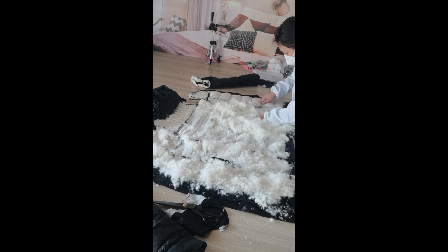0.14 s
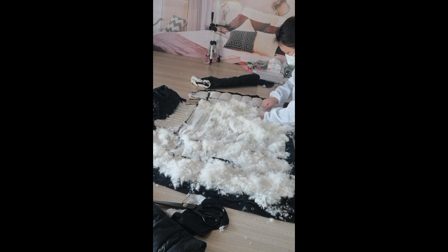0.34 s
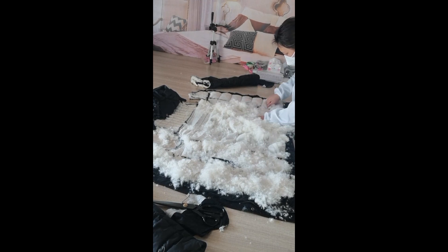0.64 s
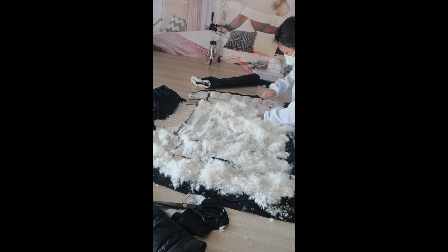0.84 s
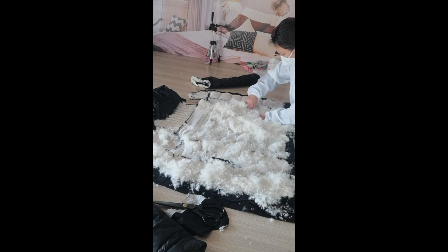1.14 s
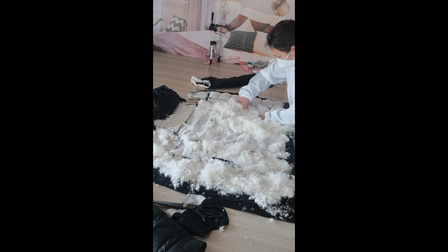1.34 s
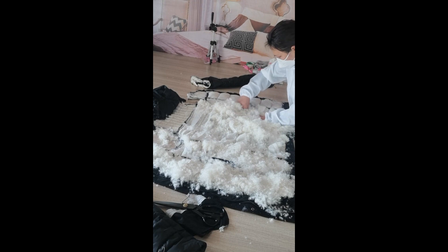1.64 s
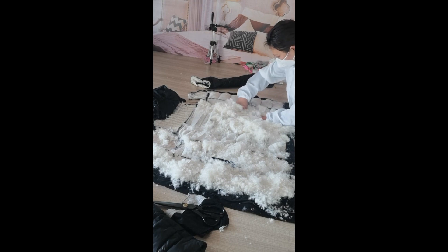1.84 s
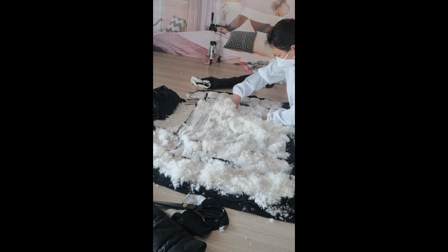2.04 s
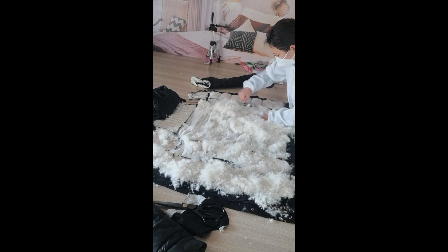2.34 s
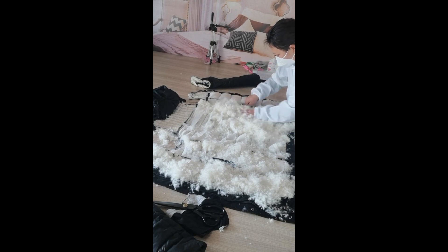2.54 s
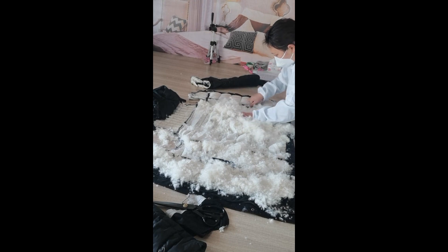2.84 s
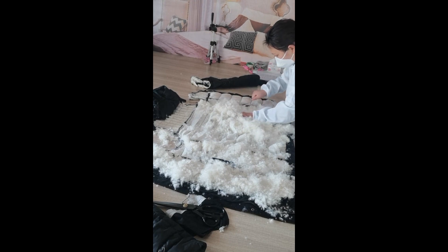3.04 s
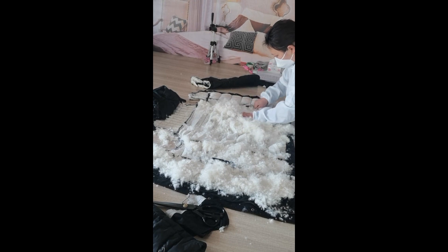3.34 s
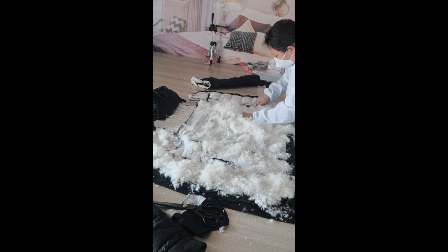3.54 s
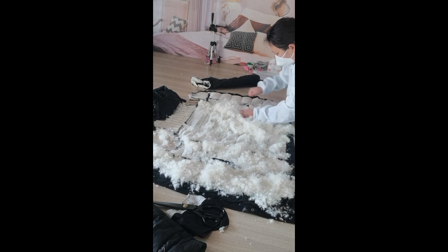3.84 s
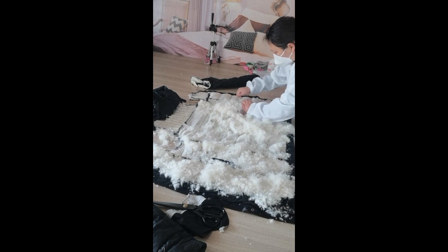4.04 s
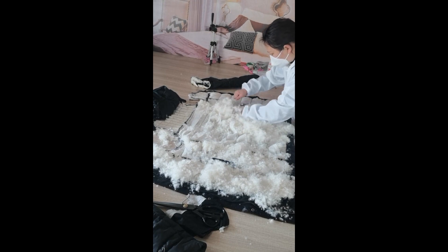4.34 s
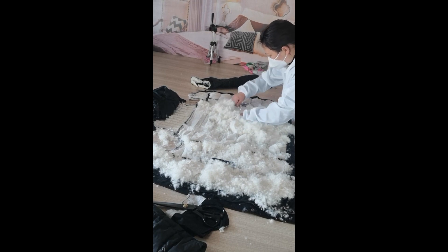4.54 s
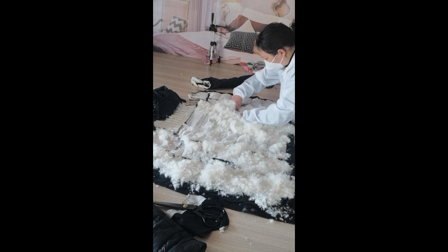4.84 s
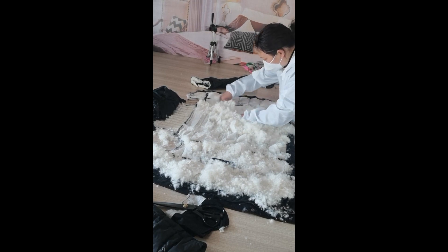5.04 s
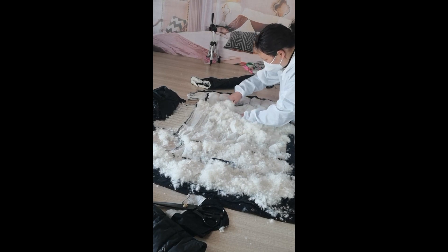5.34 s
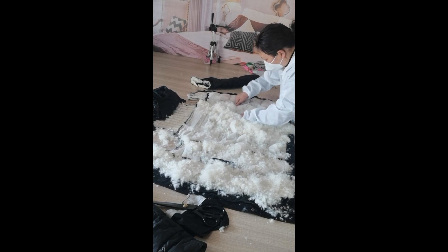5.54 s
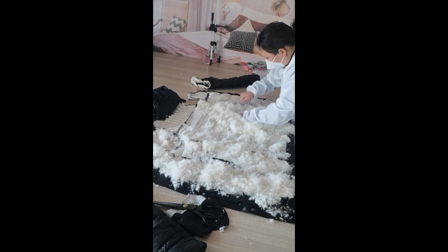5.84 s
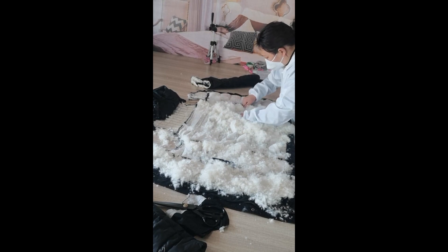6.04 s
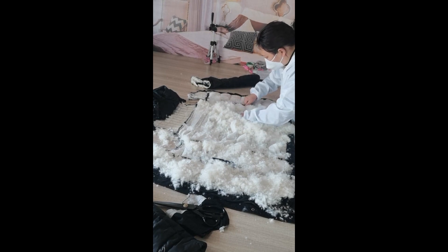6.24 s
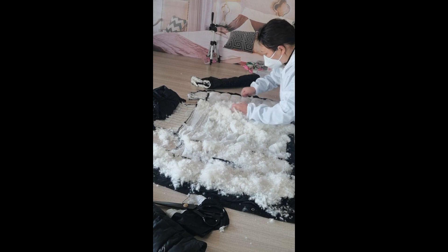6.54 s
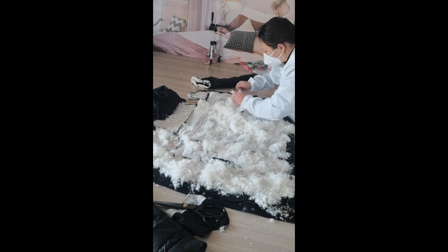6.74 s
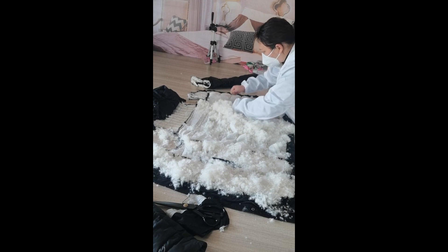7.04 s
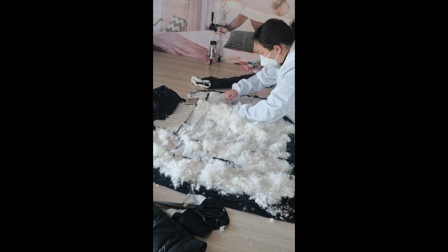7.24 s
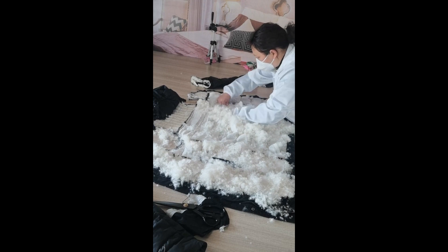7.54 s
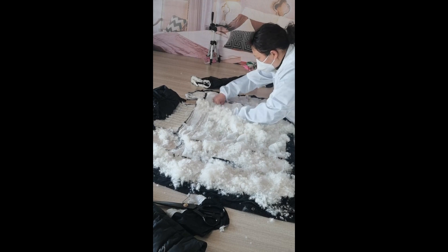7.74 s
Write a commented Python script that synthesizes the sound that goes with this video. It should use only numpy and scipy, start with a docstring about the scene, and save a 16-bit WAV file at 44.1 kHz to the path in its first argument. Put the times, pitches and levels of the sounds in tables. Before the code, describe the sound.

In a quiet furnished room, thin nylon fabric tears in quick, raspy bursts, each swelling and fading within about half a second. The jerked cloth thuds softly on the floorboards and rustles as it settles. The rips come in two runs, followed by a small dry finger tick, sleeve brushing and one softer tear. Two nearby microphones pick up a brief room echo and a faint steady rumble.

```python
"""Ripping thin nylon cloth

Hands rip the cloth in short pulls on a wooden floor, in a furnished room. Threads snap in a dense, uneven
crackle, the jerked cloth stirs the room's low notes into a boom, and the room echoes. Between pulls the cloth
rustles over a quiet rumble. Two microphones, a little apart, hear it all."""
import sys
import numpy as np
from scipy import signal
from scipy.fft import rfft, irfft, next_fast_len
from scipy.io import wavfile
from scipy.ndimage import map_coordinates

SR = 44100
rng = np.random.default_rng(int(sys.argv[2]) if len(sys.argv) > 2 else 0)


def waveform_to_disk(signal):
    """Save audio, clipped to [-1, 1], as 16-bit WAV at the path in sys.argv[1]."""
    frames = np.transpose(np.atleast_2d(signal))
    scaled = np.clip(frames, -1, 1) * 32767
    samples = np.round(scaled).astype(np.int16)
    wavfile.write(sys.argv[1], SR, samples)


N = 348390


def amp(db):
    """Turn decibels into a number to multiply by."""
    return 10 ** (np.asarray(db) / 20)


def unit(x):
    """Scale a signal so its average power is 1."""
    return x / np.sqrt(np.mean(x ** 2) + 1e-20)


def along(points, hz):
    """Read between the rows of a (Hz, value) table, with octaves evenly spaced."""
    freqs, values = np.transpose(points)
    return np.interp(np.log(hz + 1), np.log(freqs + 1), values)


def wobble(rate):
    """A smooth curve through `rate` random values a second."""
    return map_coordinates(rng.standard_normal(int(N * rate / SR) + 4), [np.arange(N) * rate / SR])


def filtered(x, response):
    """Multiply each frequency in x by response(hz)."""
    size = next_fast_len(N + SR // 2)
    return irfft(rfft(x, size) * response(np.fft.rfftfreq(size, 1 / SR)), size)[..., :N]


# How alike left and right are. Each row: frequency in Hz, likeness from 0 to 1.
LIKENESS = [(60, 1), (250, 1), (450, 1), (900, 0.23), (1900, 0.02), (4000, 0.05), (15000, 0.2)]
def diffuse(pair, spectrum, gap_s=.00055):
    """Colour and blend two noises; the travel time between microphones makes their likeness swing."""
    length = pair.shape[1]
    size = next_fast_len(2 * length)
    hz = np.fft.rfftfreq(size, 1 / SR)
    likeness = np.clip(along(LIKENESS, hz), 0, 1) * np.cos(2 * np.pi * hz * gap_s)
    turn = np.arccos(likeness) / 2
    coloured = rfft(pair, size) * amp(along(spectrum, hz))
    mid, side = irfft(coloured * [np.cos(turn), np.sin(turn)], size)[:, :length]
    return np.array([mid + side, mid - side])


# The colour of the quiet room. Each row: frequency in Hz, relative level in dB.
ROOM_COLOUR = [(12, -34), (20, -8.5), (49, 1), (70, -1.5), (103, -2.5), (157, -6), (281, -9.5),
               (382, -16.5), (613, -19.5), (787, -12.5), (855, -15), (1670, -15), (2600, -18.5),
               (6890, -37.5), (15400, -38)]
def room_tone():
    """A constant rumble and hiss whose level wavers slightly."""
    return amp(-64.5 + 1.4 * wobble(10)) * unit(diffuse(rng.standard_normal((2, N)), ROOM_COLOUR))


# Weight shifting on the floor. Each row: time in seconds, level in dB.
KNEE_LEVELS = [(2.08, -72), (2.148, -59), (2.192, -51), (2.25, -64), (2.32, -77)]
def knee_shift():
    """A knee shifts and the floor gives a low, soft rumble."""
    times, db = np.transpose(KNEE_LEVELS)
    colour = [(10, -8.5), (25, 22), (55, 24), (90, -51)]
    rumble = filtered(rng.standard_normal(N), lambda hz: amp(along(colour, hz)))
    return amp(np.interp(np.arange(N) / SR, times, db, left=-120, right=-120)) * unit(rumble)


# How long the room rings. Each row: frequency in Hz, seconds to fade by 60 dB.
RING_TIMES = [(100, 0.6), (500, 0.41), (2000, 0.39), (5000, 0.36), (10000, 0.24)]
def room_echo(x, piece_s=.25, delay_s=.0075):
    """Each frequency dies at its own speed; the tearing point moves, so each piece gets a new tail."""
    out, step = np.zeros((2, N + SR)), round(piece_s * SR)
    for start in range(0, N, step):
        hz, t, noise = signal.stft(rng.standard_normal((2, SR // 2)), SR, nperseg=256)
        decay = amp(-60 * t / along(RING_TIMES, hz)[:, None])
        tail = signal.istft(noise * decay, SR, nperseg=256)[1]
        tail = diffuse(tail, [(100, 0.016), (1000, 0), (8000, 0.0058)])
        echo = signal.fftconvolve(x[None, start:start + step], tail / np.linalg.norm(tail[0]), axes=1)
        out[:, start + round(delay_s * SR):][:, :echo.shape[1]] += echo
    return out[:, :N]


# The straight path, then four wall bounces. Each row: left delay, right delay, in seconds.
PATH_DELAYS = [(0, .00005), (.00417, .0036), (.0059, .00644), (.0101, .01065), (.0134, .0131)]
# The same paths. Each row: left gain, right gain, in dB.
PATH_GAINS = [(-0.5, -5), (-12, -7), (-3, -1.5), (-6.5, -8.5), (-15.5, -7)]
def early_paths(x):
    """Sound arrives straight, then off the walls; the bounces drift a little as the hands move."""
    out = np.zeros((2, N))
    for delays, gains_db in zip(PATH_DELAYS, PATH_GAINS):
        drift = 0.025 * delays[0] * wobble(4)
        for side, (delay, db) in enumerate(zip(delays, gains_db)):
            out[side] += amp(db) * map_coordinates(x, [np.arange(N) - SR * (delay + drift)])
    return out


def squeak(middle_s=7.45, half_length_s=.2, hz=1481.5):
    """A faint, thin tone swells and fades."""
    t = np.arange(N) / SR
    return amp(-76) * np.exp(-((t - middle_s) / half_length_s) ** 2) * np.sin(2 * np.pi * hz * t)


def finger_tick(start_s=6.5755, hz=1700, width_hz=500):
    """The fingers make one dull, dry tick: a tone that dies almost at once."""
    age = np.clip(np.arange(N) / SR - start_s, 0, 1)
    envelope = np.exp(-np.pi * width_hz * age) * (1 - np.exp(-age / 0.00017))
    return -amp(-39) * np.sin(2 * np.pi * hz * age) * envelope


# The two colours of rustling. Each row: frequency in Hz, relative level in dB.
SWISH_COLOUR = [(600, -30), (1300, -8.5), (1900, 9), (2800, -0.5), (4000, -28.5)]
HISS_COLOUR = [(2800, -2), (4200, -6), (6800, -3.5), (7600, -8.5), (8400, -27.5), (15000, -18)]
# A sleeve brushes past. Each row: middle and half length in seconds, swish and hiss levels in dB.
SLEEVE_BRUSHES = [(.02, 0.055, -75, -70), (1.21, 0.076, -98, -71.5), (1.953, 0.058, -65.5, -83),
                  (2.42, 0.085, -64.5, -89), (3.245, 0.047, -87, -104), (4.47, .15, -101, -80),
                  (4.79, 0.034, -68, -74), (5.015, 0.12, -79, -77), (7.303, 0.23, -93, -77),
                  (7.587, .08, -76, -86)]
def rustle(settle_db_per_s=44.5):
    """Sleeves brush and the cloth settles after each pull (see PULLS): a swish and a finer hiss."""
    t = np.arange(N) / SR
    out = 0
    layers = [(SWISH_COLOUR, -80.5, -35.5), (HISS_COLOUR, -77, -42.5)]
    for layer, (colour, rest_db, settle_db) in enumerate(layers):
        level = amp(rest_db + 1.2 * wobble(5))
        for middle, half_length, *db in SLEEVE_BRUSHES:
            level += amp(db[layer]) * np.exp(-((t - middle) / half_length) ** 2)
        for start, swell, _, _, swelled_db, *_ in PULLS:
            since = t - start - swell
            level += (since > 0) * amp(swelled_db + settle_db - settle_db_per_s * np.abs(since))
        grains = np.array([threads(per_second=4000, spread_db=-0.5, clump_db=-1)
                           * rng.choice([-1, 1], N) for _ in range(2)])
        out = out + level * amp(1.4 * wobble(21)) * unit(diffuse(grains, colour))
    return out


# The room's low notes. Each row: frequency in Hz, width in Hz, relative level in dB.
ROOM_NOTES = [(96, 23, -9.5), (132.2, 15.3, 0.5), (196, 33.4, -6.5)]
def room_boom(shaking):
    """The jerked cloth stirs the room, which rings at its own low notes."""
    def response(hz):
        return sum((-1) ** k * amp(db) * 1j * hz * width / (note ** 2 - hz ** 2 + 1j * hz * width)
                   for k, (note, width, db) in enumerate(ROOM_NOTES))
    return amp(25) * filtered(shaking, response)


# Pulls on the cloth. Each row: start, swell time and fade time in seconds, crackle level in dB before
# and after the swell, then how many dB to add to that for the boom, flap, dull, bright and rasp parts.
PULLS = [(.03, 0.061, 0.034, -62, -44, -6, -5, -9, -3, 1.5),
         (0.092, 0.08, .23, -36.5, -32, -15.5, -16, -13, -7.5, -1),
         (0.597, 0.065, 0.12, -62, -48, -5.5, -6, -9.5, -4, -5),
         (.695, .003, 0.043, -28, -26.5, -20, -10, -17, -13, -7.5),
         (0.711, 0.048, 0.22, -38, -34, -11, -13, -12, -4, 0.5),
         (1.396, 0.0068, 0.19, -54, -53.5, -17, -12, -16, -13, -4.5),
         (1.475, 0.0027, 0.066, -50, -53, -7.5, -13.5, -11.5, -10.5, 2.5),
         (1.5, 0.075, 0.11, -65, -60, -4.5, -18, -20, -15, -3),
         (2.016, 0.0041, 0.02, -46, -44, -14, -11.5, -28, -11, -3),
         (2.057, 0.0069, 0.032, -32, -32.5, -12, -9.5, -21, -4.5, -1),
         (2.087, 0.0083, 0.28, -39, -38.5, -10.5, -15, -12, 0, -2),
         (2.857, 0.043, .04, -60.5, -47, -22, -3, -3.5, -1.5, -2.5),
         (2.901, .003, .05, -43, -41, -20, -2, -4, -13, -8),
         (2.909, 0.067, 0.2, -42, -33.5, -11.5, -9, -8, -6, -1),
         (3.441, 0.0059, 0.56, -43, -50.5, -18, -20, -22, -3, -3),
         (3.58, 0.011, .09, -30, -37.5, -5, -8, -12, -5.5, -3),
         (3.637, .004, 0.036, -38, -46, 4, 3.5, -14, -4.5, -5),
         (3.648, 0.061, 0.18, -39, -38.5, -3, -7.5, -10, -5, -3),
         (5.042, 0.02, 0.13, -43, -36, -35, -24, -8.5, -12, -6),
         (5.06, 0.036, .27, -41, -36.5, -29, -19, -5.5, -9, -5.5),
         (5.562, 0.011, .03, -59, -53.5, -16, -15, -15, -1, 0),
         (5.582, 0.0036, .1, -43, -40.5, -15, -14.5, -14.5, -5.5, -2.5),
         (5.632, .003, 0.043, -34, -36, -23, -8, -15, -5, 1),
         (5.639, 0.061, 0.2, -47, -34.5, -14.5, -11.5, -8, -6.5, -3.5),
         (6.112, 0.018, 0.048, -70, -46, -27, -2.5, -13, 1.5, -3),
         (6.139, .005, 0.1, -40, -43, -24, -6, -13, 2, -3),
         (6.176, 0.068, 0.18, -46, -39.5, -13.5, -9.5, -12.5, -4, 0.5),
         (7.646, 0.0068, 0.046, -49, -38, -21, -16, -19, -10.5, -4),
         (7.672, .01, 0.11, -49, -45.5, -20, -10, -10, -4.5, -0.5),
         (7.721, 0.026, .2, -44.5, -47.5, -17, -10, -11.5, -5, 0)]
# How the colour shifts during a pull, in dB per second, for boom, flap, dull, bright and rasp.
COLOUR_DRIFT = [39, -8, -9, -22.5, -10]
def pull_levels(fade_db=31, fade_bend=1.426):
    """Each pull starts at once, swells or sags, then fades ever faster; one gain curve per part."""
    t = np.arange(N) / SR
    power = np.zeros((6, N))
    for start, swell, fade, start_db, swelled_db, *parts_db in PULLS:
        inside = slice(round(start * SR), round((start + swell + 2 * fade) * SR))
        age = np.abs(t[inside] - start)
        db = np.interp(age, [0, swell], [start_db, swelled_db])
        db -= fade_db * (np.clip(age - swell, 0, None) / fade) ** fade_bend
        offsets = [part + drift * (age - swell) for part, drift in zip(parts_db, COLOUR_DRIFT)]
        power[:, inside] += [amp(2 * (db + offset)) for offset in [0] + offsets]
    return np.sqrt(power)


def threads(per_second, spread_db, clump_db):
    """Threads part at random moments: spikes of uneven strength, louder in clumps."""
    parting = rng.random(N) < per_second / SR
    size = np.minimum(rng.exponential(size=N), 3)
    return -unit(parting * amp(spread_db * size + clump_db * wobble(70)))


def clicks(spikes, colour, lag=1.2):
    """Turn spikes into short clicks of this colour; the lows trail the highs a little."""
    return filtered(spikes, lambda hz: unit(amp(along(colour, hz))) * np.exp(-1j * lag * np.log(hz + 1)))


# The five parts of a snap, from low to high. Each row: frequency in Hz, relative level in dB.
FLAP_COLOUR = [(60, -80), (160, -23), (220, -1), (310, -1.5), (430, -6), (560, -10), (900, -42)]
DULL_COLOUR = [(200, -62), (450, -18), (620, -3.5), (900, -0.5), (1200, -1), (1700, -47.5)]
CRACK_COLOUR = [(300, -61), (800, -22), (1250, -5), (1600, 2.5), (1900, 4.5), (2400, 1), (2900, -0.5),
                (3400, -23), (4400, -45.5)]
RASP_COLOUR = [(1500, -82), (2400, -18), (2900, -5.5), (3400, 1.5), (4200, -0.5), (5000, -14), (6200, -47)]
BRIGHT_COLOUR = [(2000, -86.5), (3600, -37), (4800, 2), (5600, 2.5), (6800, 5), (7600, -2.5), (8300, -16),
                 (9000, -78), (11000, -23.5), (15000, -35)]
# The loudest single threads. Each row: time in seconds, relative level in dB.
LOUD_SNAPS = [(.0978, -23), (.1165, -23), (.1273, -21), (.1414, -21), (.1538, -20), (.1723, -22),
              (.6131, -44), (.6317, -32), (.6421, -29), (.657, -27), (.6987, -18), (.7073, -20),
              (.7488, -21), (1.4073, -42), (1.4464, -40), (1.4795, -37), (2.0208, -34), (2.0625, -25),
              (2.0695, -22), (2.094, -21), (2.0966, -22), (2.8802, -37), (2.9039, -28), (2.9383, -23),
              (2.9759, -22), (2.991, -23), (3.4595, -40), (3.5816, -31), (3.5944, -29), (3.6397, -22),
              (3.6406, -20), (3.6414, -19), (3.6421, -23), (3.6574, -26), (5.0527, -28), (5.0897, -25),
              (5.116, -24), (5.586, -34), (5.637, -26), (5.6777, -25), (5.7046, -26), (5.7217, -24),
              (5.7431, -27), (6.1155, -39), (6.1447, -31), (6.1798, -23), (6.191, -24), (6.2466, -25),
              (7.6497, -30), (7.6627, -29), (7.6752, -27), (7.7249, -31), (7.7461, -29)]
def tear():
    """Pulls snap the threads and stir the room's low notes; most snaps are a tiny suck of air."""
    levels = pull_levels()
    snaps = np.zeros(N)
    for time, db in LOUD_SNAPS:
        snaps[round(time * SR)] = -amp(db)
    flips = np.where(rng.random(N) < .25, -1, 1)
    crackle = levels * flips * threads(per_second=800, spread_db=3.5, clump_db=2)
    # Single snaps take the colour of the pull around them, but are too light to stir the low notes much.
    pull_colour = levels / (levels[0] + 1e-12)
    snap_gains = amp([[15], [-6], [4], [13], [16], [15]])
    crack, boom, flap, dull, bright, rasp = crackle + snap_gains * snaps * pull_colour
    parts = [(crack, CRACK_COLOUR, -6), (flap, FLAP_COLOUR, -8), (dull, DULL_COLOUR, -6),
             (rasp, RASP_COLOUR, -11), (bright, BRIGHT_COLOUR, -6)]
    # The lag in clicks() turns the wave upside down; the minus sign turns it back.
    rip = -sum(amp(db) * clicks(spikes, colour) for spikes, colour, db in parts)
    return rip, room_boom(boom)


def scene():
    """Mix everything; the boom's waves are so long that both microphones hear it alike."""
    rip, boom = tear()
    small = finger_tick() + squeak()  # close to the microphones, so they get little echo
    echo = amp(1.5) * room_echo(rip + amp(-9.5) * boom + amp(-10) * small)
    return early_paths(rip + small) + boom + echo + rustle() + knee_shift() + room_tone()


def record(dry, top_hz=15595, offset=-.0003):
    """The recorder keeps nothing above its top frequency and sits a little off zero."""
    return filtered(dry, lambda hz: hz < top_hz) + offset


dry = scene()
out = record(dry)
waveform_to_disk(out)
```